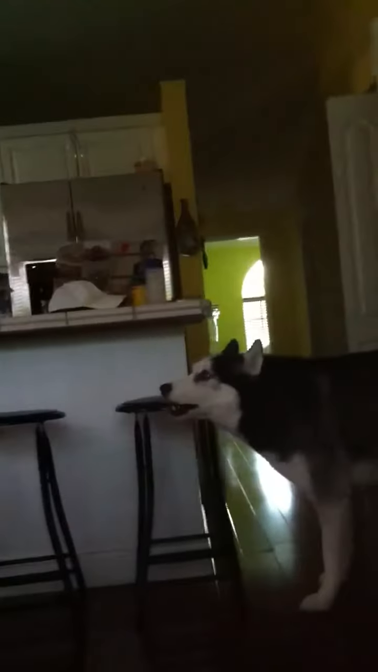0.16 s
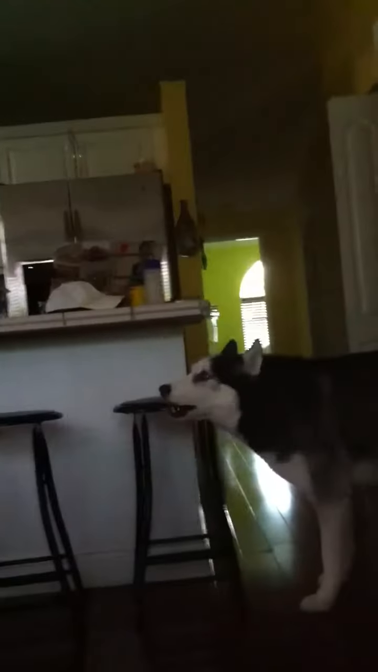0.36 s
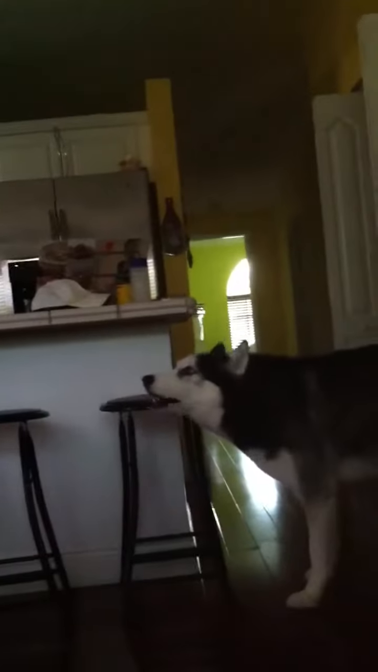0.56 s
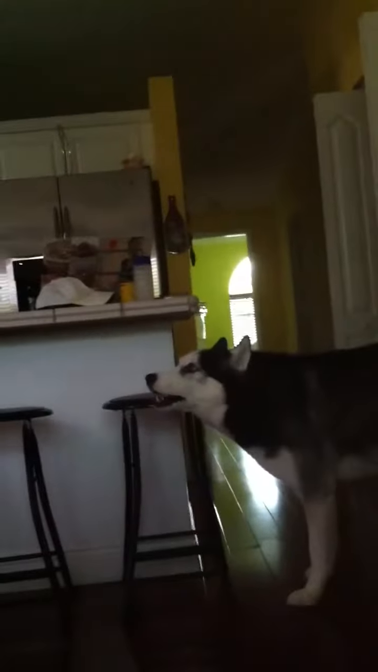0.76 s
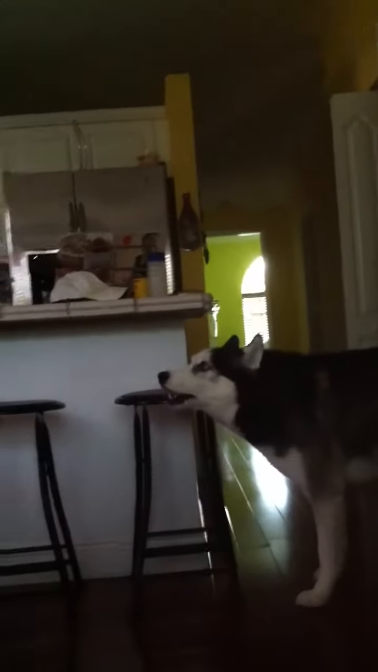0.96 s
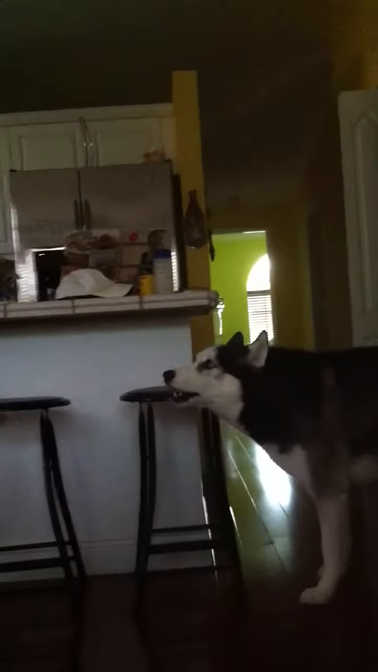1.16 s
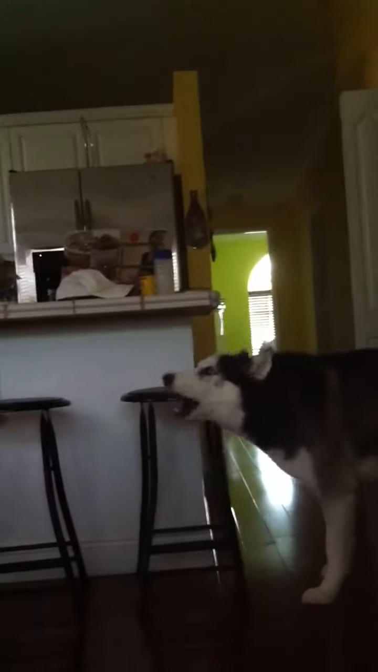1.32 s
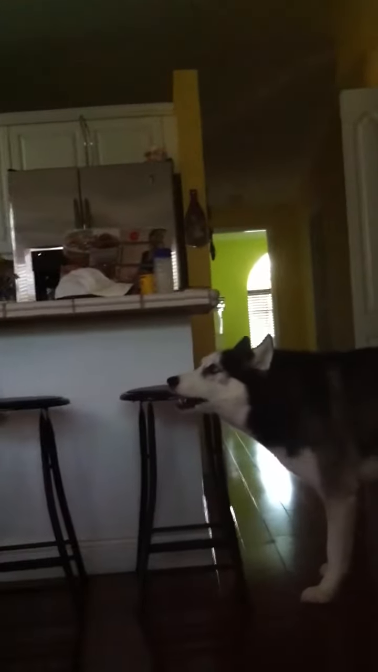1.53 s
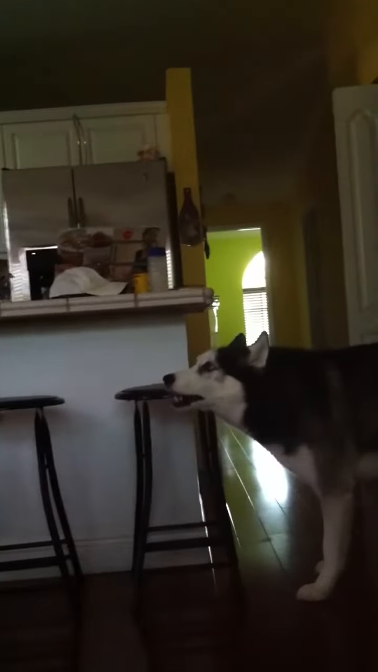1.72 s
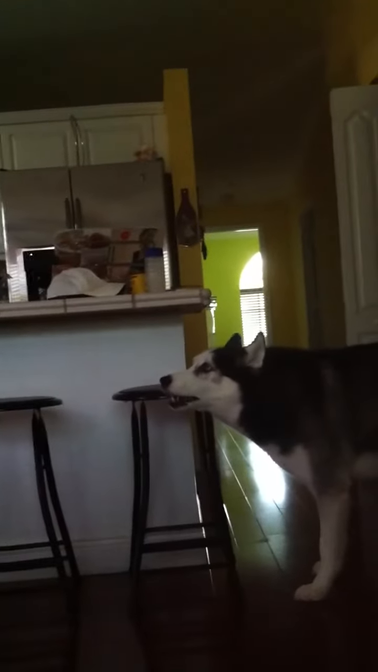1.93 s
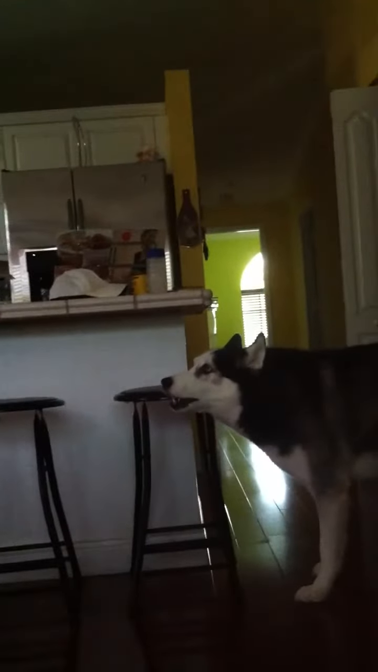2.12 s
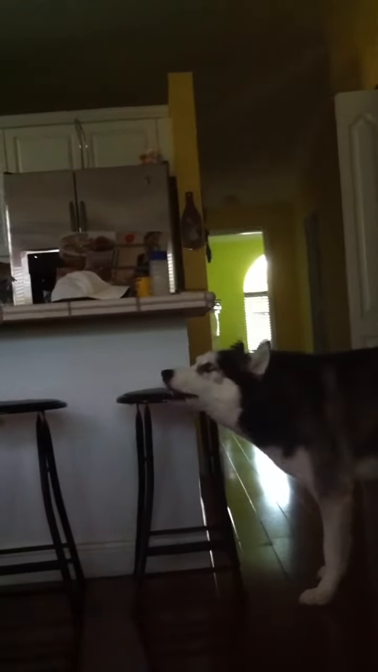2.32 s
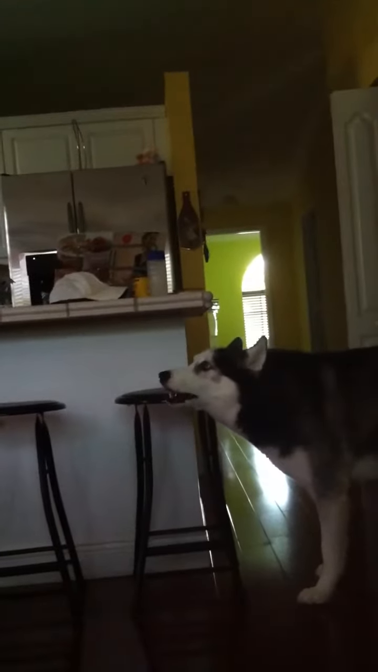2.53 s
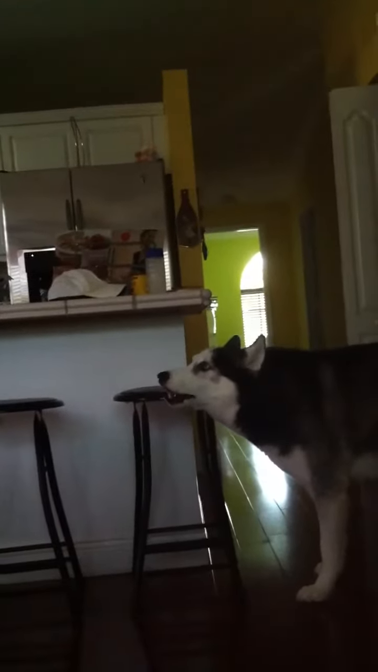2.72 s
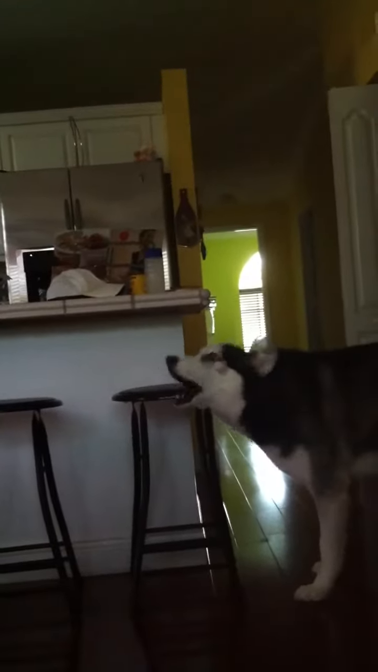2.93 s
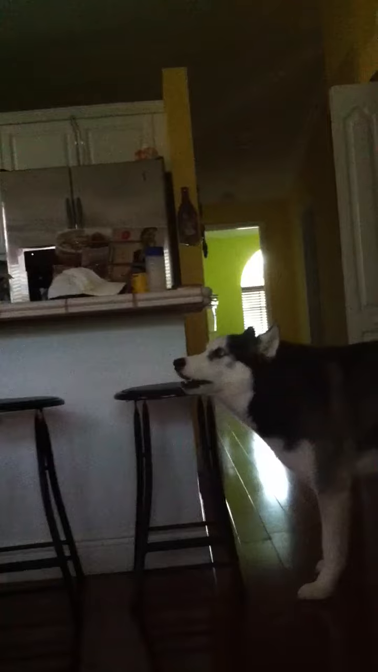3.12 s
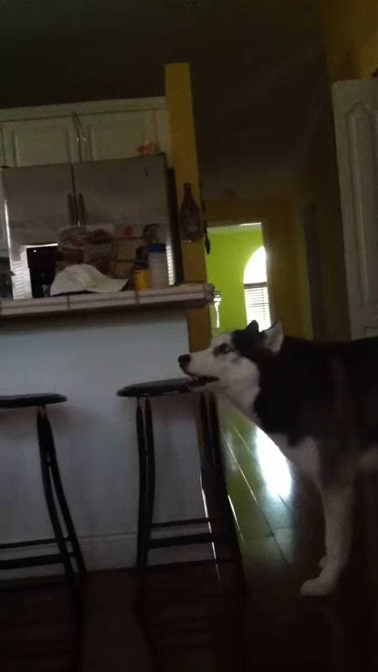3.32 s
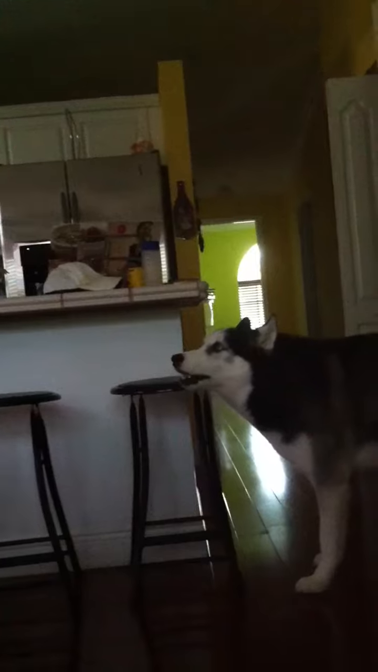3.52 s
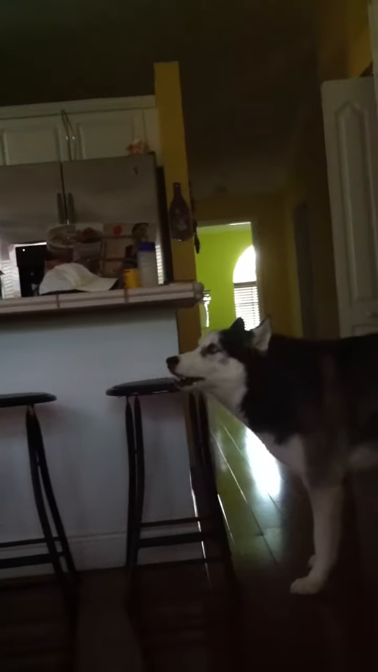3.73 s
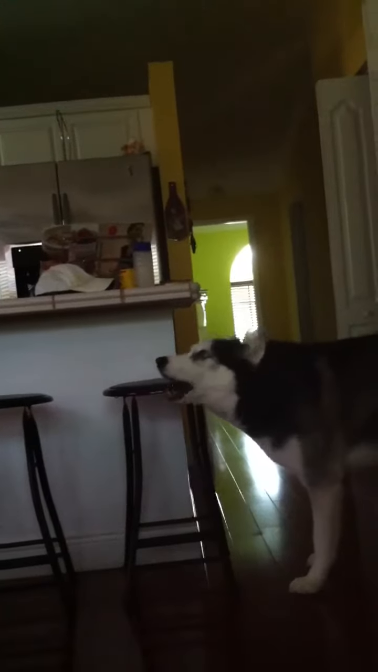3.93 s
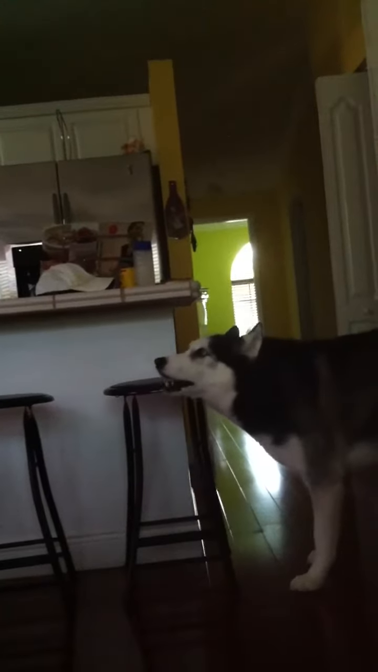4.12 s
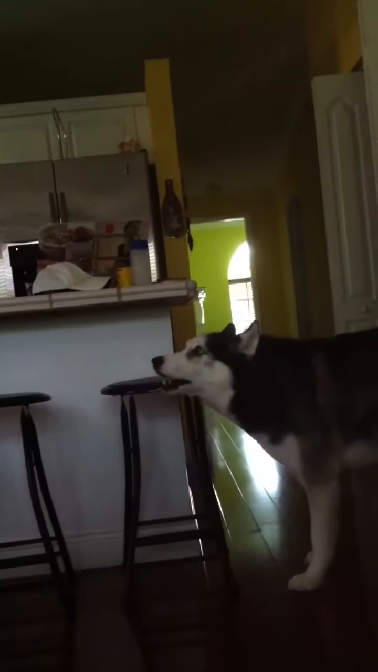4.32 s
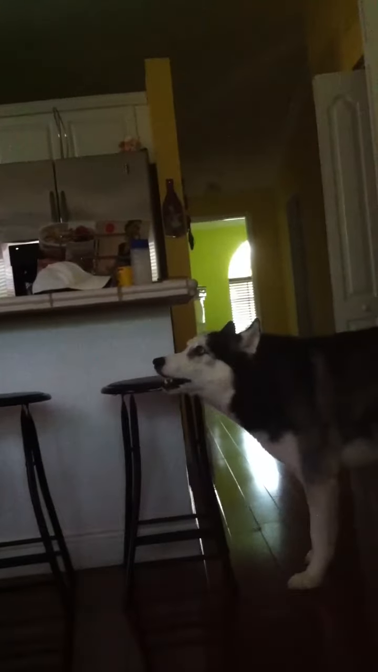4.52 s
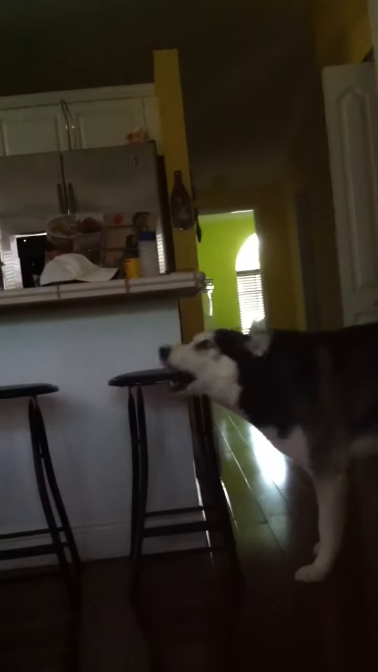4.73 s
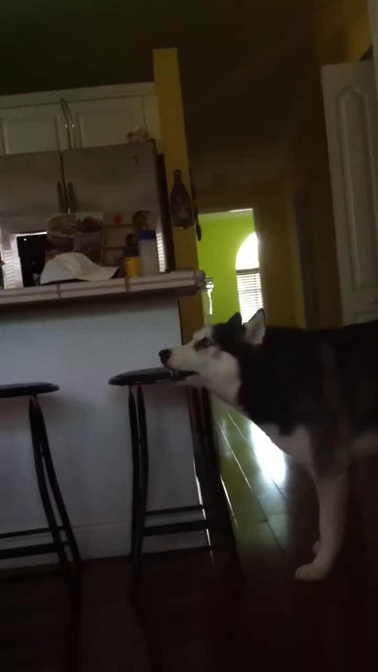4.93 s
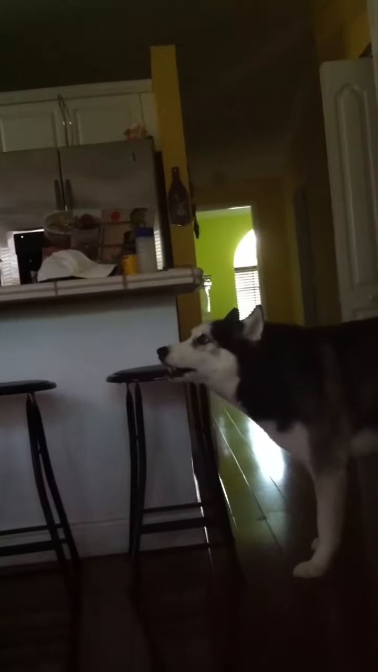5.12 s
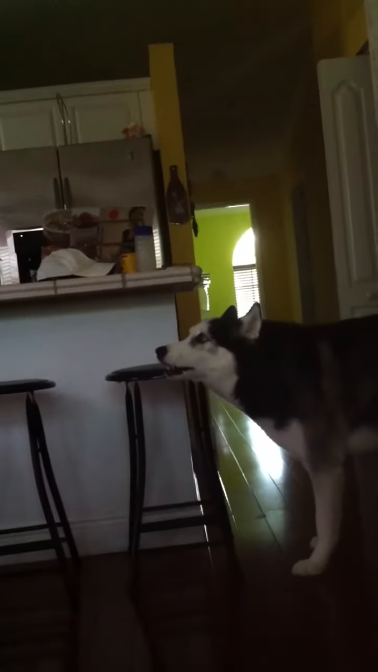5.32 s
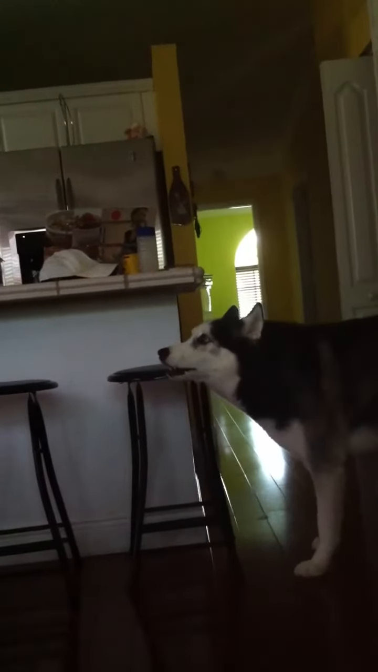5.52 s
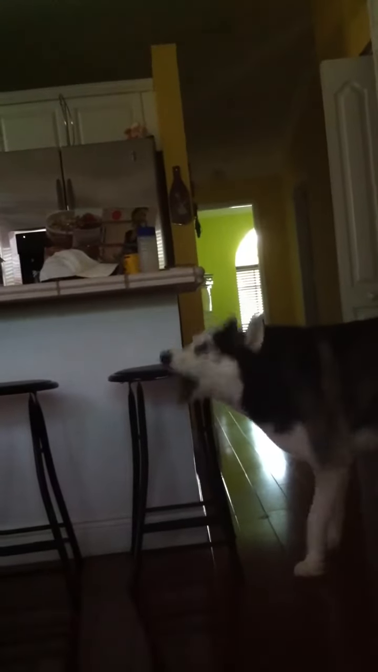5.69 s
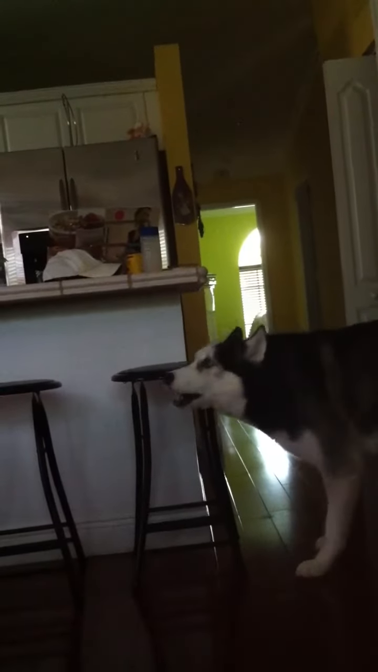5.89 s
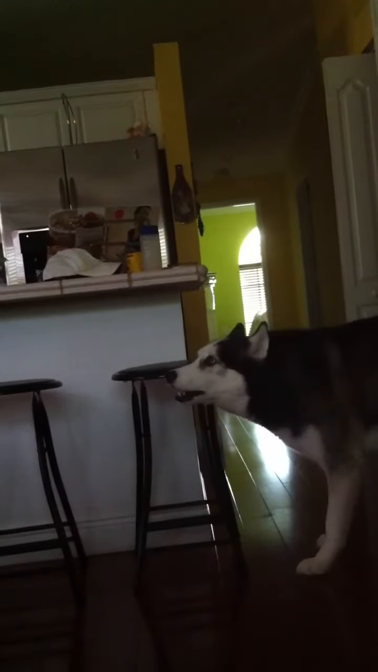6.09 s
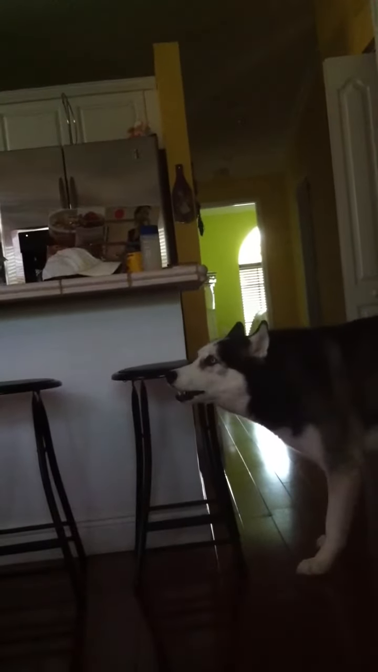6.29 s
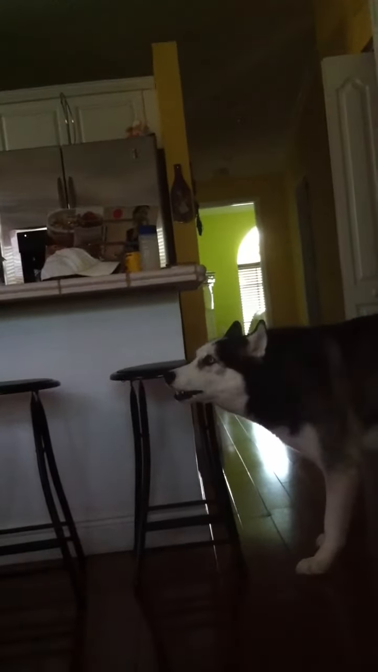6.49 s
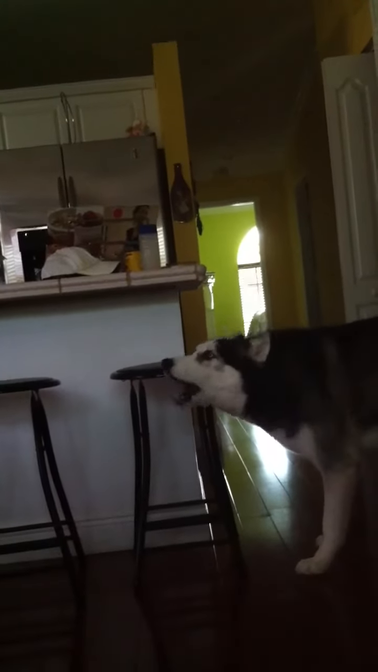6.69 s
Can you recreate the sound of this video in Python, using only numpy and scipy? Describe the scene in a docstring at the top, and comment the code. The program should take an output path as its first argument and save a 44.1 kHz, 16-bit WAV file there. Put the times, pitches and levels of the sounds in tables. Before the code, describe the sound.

The sound opens on the fading echo of an earlier bark over a soft, steady room tone with a little low hum. A husky then barks eight times in a hard-floored kitchen, at about 0.5, 1.3, 2.3, 3.0, 3.9, 4.7, 5.8 and 6.7 seconds, the last right at the end. Each bark is short and loud: a quick huff swells into a hoarse, throaty rush of air with a mid-pitched tone that usually rises slightly, then stops. The barks are similar in strength, the first a little softer, and their peaks sound slightly flattened. At about 2.3 seconds, out of the third bark, something like a glass rings very faintly and dies away over a second or so. The single microphone is well out in the room, so each bark leaves an echo lasting up to a second.

```python
"""A husky in a hard-floored, echoing kitchen, on one microphone well out in the room's reverberation.
We open on the tail of an earlier bark over soft room tone; eight barks follow, about one a second.
Each starts as a huff, swells to a hoarse rush of air with a mostly rising tone near 500 Hz, shaped by
throat and mouth, and stops. The recorder's limiter flattens the peaks; the room rings on in the gaps.
After the third bark something, perhaps a glass, rings faintly."""
import sys
import numpy as np
from scipy import signal
from scipy.fft import rfft, irfft
from scipy.io import wavfile
from scipy.ndimage import uniform_filter1d, minimum_filter1d

SR = 44100
rng = np.random.default_rng(int(sys.argv[2]) if len(sys.argv) > 2 else 0)


def log_audio(samples):
    """Write samples as a 16-bit WAV file to the path given in sys.argv[1]."""
    # one column per channel
    frames = np.atleast_2d(samples).T
    # limit to full scale, then quantise
    limited = np.clip(frames, -1, 1)
    pcm = np.round(limited * 32767).astype(np.int16)
    wavfile.write(sys.argv[1], SR, pcm)


N = 297675

# one row per bark; the other levels are relative to effort, and length and lift count from the peak:
# (peak time [s], attack [s], lead-in huff [dB], length [s], effort [dB], throat [dB], clear tone [dB],
# open mouth [dB], bared teeth [dB], first pitch [Hz], last pitch [Hz], pitch lift [s], vowel centre [Hz])
BARKS = [ (0.505, .038, -14, .100, -16, 3, 1.5, -4.5, -10, 491.8, 562.1, .060, 1407),
         (1.335, 0.034, -31, 0.088, -11.5, 0, -0.5, -5, -11.5, 513.8, 564.1, .048, 1422),
         (2.258, 0.03, -23, 0.091, -13, 1, 0, -5.5, -9, 516.4, 560, 0.027, 1640),
         (2.963, 0.03, -36, .096, -12, 1.5, -4, -4.5, -10.5, 523.4, 568, 0.056, 1440),
         (3.936, .030, -22, .116, -13, 1, -1, -8, -11, 507, 565.6, .022, 1576),
         (4.738, 0.027, -36, .098, -12.5, 1, 0, -4.5, -11.5, 544.7, 529.5, .040, 1462),
         (5.767, .031, -35.5, 0.095, -13.5, 1, 3, -4, -13, 469.7, 529.7, 0.0051, 1397),
         (6.708, 0.035, -16, 0.12, -14, 2.5, 4, -5.5, -11.5, 490.7, 539.6, .024, 1460), ]
# resonances of the throat: (centre [Hz], width [Hz], level [dB])
THROAT_BANDS = [(392.3, 48, -12), (599, 190, -2.5), (668, 166, 2.5), (861, 102.4, 3.5), (981, 45.7, -2.5)]
# resonances of the open mouth: (centre [Hz], width [Hz], level [dB])
MOUTH_BANDS = [(1480, 280, -6.5), (1860, 120, -7.5)]
# resonances at the bared teeth: (centre [Hz], width [Hz], level [dB])
TEETH_BANDS = [(2260, 190, 4.5), (2386, 100, -7.5), (2913, 160, -8.5)]
# the teeth's brief bright bite just before the peak: (centre [Hz], width [Hz], level [dB])
BITE_BANDS = [(2393, 230, -1)]
# the breathy "wuh" before the folds lock into a tone: (centre [Hz], width [Hz], level [dB])
HUFF_BANDS = [(457, 149, -2)]
# the push of the chest: (centre [Hz], width [Hz], level [dB])
CHEST_BANDS = [(127.4, 49, -30.5), (188, 44, -26.5), (306, 45, -28.5)]
# air hissing over the tongue: (centre [Hz], width [Hz], level [dB])
HISS_BANDS = [(5984, 870, -25), (6565, 940, -26)]
# thin spray of turbulence from the throat: (centre [Hz], width [Hz], level [dB])
SPRAY_BANDS = [(4610, 330, -40), (8090, 1800, -34), (10200, 1600, -31.5), (13400, 2600, -36.5)]
# reverberation of the kitchen: (frequency [Hz], t60 [s])
KITCHEN_T60 = [(100, 0.17), (200, 0.59), (350, 0.41), (550, 0.68), (1000, 0.97), (2000, 1), (3000, 0.79),
               (6000, 0.79), (10000, 0.43), (16000, .35)]
# standing waves between floor, counter and walls: (frequency [Hz], t60 [s], level [dB])
KITCHEN_MODES = [(186.8, 0.21, 2), (369.2, 0.16, -2.5), (436, 0.19, 0.5), (477.5, 0.3, -2),
                 (514.2, 0.14, -4), (564, 0.83, -1), (738, 0.11, 4), (805, 0.3, 1.5), (970, 1, 6.5),
                 (959.6, 0.17, 3), (1074, 0.07, -3.5), (1348, 0.026, -8.5), (1400, 0.057, 1),
                 (1490, 0.12, -8), (1580, .14, -1), (1610, 0.99, -11.5), (1756, 0.19, -7.5),
                 (2005, 0.11, -3.5), (2310, 0.18, -6.5), (2423, 0.022, -0.5)]
# the partial of a ringing object, perhaps a glass: (frequency [Hz], t60 [s], level [dB])
RING_PARTIAL = (1667.5, 1.93, -39)
# spectrum of the house's room tone: (frequency [Hz], relative level [dB])
ROOM_TONE = [(30, -31), (80, -24.5), (120, 1), (150, -6.5), (190, 7), (260, -0.5), (500, -5), (1500, 0.5),
             (4000, -9), (7000, -12), (11000, -19), (16000, -23.5)]

PRE_ROLL = SR  # samples ahead of the opening, so that the room is already ringing
LEAD_IN_S = .11  # each bark starts this long before its peak


def dog(earlier_s=0.87):
    """The husky barks in turn, after one earlier bark that ends in the pre-roll."""
    out = np.zeros(PRE_ROLL + N + SR)
    peaks = [row[0] for row in BARKS]
    for peak_s, row in zip([peaks[0] - earlier_s] + peaks, [BARKS[0]] + list(BARKS)):
        sound = bark(row)
        start = PRE_ROLL + round((peak_s - LEAD_IN_S) * SR)
        out[start:start + len(sound)] += sound
    return out[:PRE_ROLL + N]


def bark(row, release_s=.028, glide_s=.016, opening_s=0.034, rattle_db=2.0,
         vowel_hz_per_s=1600, tone_db_per_s=41.5):
    """One bark at the muzzle: the chest pushes, the folds rasp and then sing, the jaws open."""
    (_, attack_s, huff_db, length_s, peak_db, throat_db, tone_db, mouth_db, teeth_db,
     first_hz, last_hz, lift_s, vowel_hz) = row
    t = np.arange(SR // 3) / SR - LEAD_IN_S  # 0 at the peak
    fade_in = np.clip((t - t[0]) / .005, 0, 1)
    release = np.exp(-(np.maximum(t - length_s, 0) * 2 / release_s) ** 2)
    push_db = effort(t, attack_s, huff_db)
    lifted = (1 + np.tanh((t - lift_s) / glide_s)) / 2
    pitch = (first_hz + (last_hz - first_hz) * lifted) * (1 + .012 * wobble(30, len(t)))
    # the bark opens up, from 0 to 1, with the air spent so far
    gape = 1 - np.exp(-np.cumsum(from_db(push_db)) / SR / opening_s)
    rasp = larynx(pitch, jitter=.08, shimmer=0.76, air=0.87)
    rasp *= from_db(rattle_db * wobble(120, len(t)))  # loose throat tissue rattles the airflow
    throat = from_db(throat_db + 0.18 * push_db) * even(resonate(rasp, THROAT_BANDS))
    mouth = from_db(mouth_db) * open_mouth(rasp, t, vowel_hz + vowel_hz_per_s * (t - length_s / 2))
    teeth = from_db(teeth_db) * bared_teeth(rasp, t)
    # the huff gives way to a clear tone, and the voice grows purer as the pressure falls
    sung = clear_tone(pitch, jitter=0.03, flutter_db=2.5, second_db=-13.5, third_db=-17.5)
    huff_to_tone = even(np.sqrt(gape) * sung + (1 - gape) * resonate(rasp, HUFF_BANDS))
    tone = from_db(tone_db + tone_db_per_s * np.maximum(t, 0)) * huff_to_tone
    chest = from_db(3.5 - 0.37 * push_db - 17 * gape) * resonate(rasp, CHEST_BANDS)  # heard early
    voice = throat + mouth + teeth + tone + chest + breath(push_db, gape)
    return fade_in * release * from_db(peak_db + push_db) * voice


def effort(t, attack_s, huff_db, depth_db=11.5, huff_ahead_s=0.03, huff_db_per_s=380.5,
           hold_s=0.029, sag_db_per_s=105):
    """Push of the breath in dB: soft huff, steep swell, short hold, then a sag as the air is spent."""
    before = np.maximum(-t, 0)
    swell = -depth_db * (before / attack_s) ** 1.79
    huff = huff_db - huff_db_per_s * np.maximum(before - huff_ahead_s, 0)
    return np.maximum(swell, huff) - sag_db_per_s * np.maximum(t - hold_s, 0)


def larynx(pitch, jitter, shimmer, air):
    """Vocal folds slap irregularly; every opening lets out a puff of turbulent air."""
    size = len(pitch)
    cycles = np.cumsum(pitch * (1 + jitter * wobble(220, size))) / SR
    slaps = np.diff(np.floor(cycles), prepend=0) * (1 + shimmer * rng.standard_normal(size))
    puffs = rng.standard_normal(size) * (1 + np.cos(2 * np.pi * cycles))
    return rms_one(slaps - slaps.mean()) + air * rms_one(puffs)


def clear_tone(pitch, jitter, flutter_db, second_db, third_db):
    """The regular part of the folds' swing: a strong fundamental with two weak overtones."""
    size = len(pitch)
    phase = 2 * np.pi * np.cumsum(pitch * (1 + jitter * wobble(120, size))) / SR
    wave = np.sin(phase) + from_db(second_db) * np.sin(2 * phase) + from_db(third_db) * np.sin(3 * phase)
    return rms_one(wave * from_db(flutter_db * wobble(62, size)))


def open_mouth(rasp, t, vowel_hz, ahead_s=0.0077, open_s=0.043, shut_db=-10.5):
    """The jaws open around the peak and let the mouth ring; its resonance climbs: "wo-ah"."""
    opened = (1 + np.tanh((t + ahead_s) / open_s)) / 2
    vowel = from_db(-0.5) * moving_resonance(rasp, vowel_hz, width_hz=160)
    return from_db(shut_db * (1 - opened)) * even(vowel + resonate(rasp, MOUTH_BANDS))


def bared_teeth(rasp, t, bite_ahead_s=.022, bite_s=0.019, rise_db_per_s=48):
    """The teeth give a bright bite just before the peak, and ring again as the jaws close."""
    biting = from_db(1.5) * np.exp(-((t + bite_ahead_s) / bite_s) ** 2)
    bared = from_db(-3.5 + rise_db_per_s * np.maximum(t, 0))
    ringing = even(band(resonate(rasp, TEETH_BANDS), 1900, 3150))
    return bared * ringing + biting * even(resonate(rasp, BITE_BANDS))


def breath(push_db, gape, gust_db=2.0):
    """Gusts of air: a hiss over the tongue that swells as the jaws part, and spray from the throat."""
    air = rng.standard_normal(len(gape)) * from_db(gust_db * wobble(50, len(gape)))
    hiss = gape ** .55 * from_db(-1.5 + 0.1 * push_db) * resonate(air, HISS_BANDS)
    spray = from_db(0.18 * push_db) * resonate(air, SPRAY_BANDS)
    return hiss + spray


def kitchen(x, direct_db=-4.0, early_db=-4.0, early_t60=0.063, late_db=-5.5,
            build_s=0.015, diffuse_hz=700):
    """At the microphone: direct sound, echoes off floor and counter, a diffuse tail, standing waves."""
    t = np.arange(3 * SR // 2) / SR
    edges = np.geomspace(60, 20000, 19)
    white = rng.standard_normal((2, len(t))) / np.sqrt(SR)
    response = np.zeros(len(t))
    for k, (low, high) in enumerate(zip(edges, edges[1:])):
        hz = np.sqrt(low * high)
        echoes = band(white[k % 2], low, high)
        scattered = hz / np.hypot(hz, diffuse_hz)  # furniture scatters only the short waves
        early = (scattered * from_db(early_db), early_t60)
        late = (from_db(late_db), at_hz(KITCHEN_T60, hz))
        for gain, t60 in early, late:
            decay = np.log(1000) / t60
            response += gain * np.sqrt(2 * decay) * np.exp(-decay * t) * echoes
    response *= 1 - np.exp(-t / build_s)
    for hz, t60, db in KITCHEN_MODES:
        decay = np.log(1000) / t60
        response += from_db(db) * 2 * decay / SR * np.exp(-decay * t) * np.cos(2 * np.pi * hz * t)
    return from_db(direct_db) * x + signal.fftconvolve(x, response)[:len(x)]


def faint_ring(start_s=2.32, swell_s=.03):
    """Somewhere in the room one soft partial swells out of the third bark and dies away."""
    hz, t60, db = RING_PARTIAL
    t = np.maximum(np.arange(N) / SR - start_s, 0)
    swell = 1 - np.exp(-t / swell_s)
    return from_db(db - 60 * t / t60) * swell * np.sin(2 * np.pi * hz * t)


def room_tone(level_db=-61.5):
    """The house behind it all: a steady soft rush with a little rumble."""
    hz = np.arange(N // 2 + 1) * SR / N
    spectrum = rfft(rng.standard_normal(N)) * from_db(at_hz(ROOM_TONE, hz))
    return from_db(level_db) * rms_one(irfft(spectrum, N))


def resonate(x, bands):
    """Parallel resonances, each at its own rms level."""
    return sum(from_db(db) * rms_one(band(x, hz - width / 2, hz + width / 2)) for hz, width, db in bands)


def moving_resonance(x, hz, width_hz):
    """A band-pass whose centre slides along hz."""
    carrier = np.exp(2j * np.pi * np.cumsum(hz) / SR)
    lowpass = signal.butter(2, width_hz / 2, fs=SR, output="sos")
    return rms_one((signal.sosfilt(lowpass, x / carrier) * carrier).real)


def band(x, low, high):
    """Band-pass between two edges in Hz."""
    edges = np.clip([low, high], 10, SR / 2 - 100)
    return signal.sosfilt(signal.butter(2, edges, "band", fs=SR, output="sos"), x)


def wobble(rate_hz, size):
    """Smooth random drift with an rms of 1."""
    lowpass = signal.butter(2, rate_hz, fs=SR, output="sos")
    return rms_one(signal.sosfilt(lowpass, rng.standard_normal(2 * size))[size:])


def even(x):
    """Hold the rms near 1 over about 14 ms, keeping the faster grain."""
    return x / np.sqrt(uniform_filter1d(x ** 2, size=601) + 1e-3)


def at_hz(points, hz):
    """Read a table on a log-frequency axis."""
    table = np.array(points)
    return np.interp(np.log(np.maximum(hz, 1)), np.log(table[:, 0]), table[:, 1])


def from_db(db):
    return 10 ** (np.asarray(db) / 20)


def rms_one(x):
    return x / np.sqrt(np.mean(x ** 2) + 1e-20)


def scene():
    """What reaches the one microphone: the dog in the kitchen, the faint ring, the room tone."""
    return (kitchen(dog())[PRE_ROLL:] + faint_ring() + room_tone())[None]


def limiter(x, threshold_db, release_db_per_s=40):
    """The recorder's gain ducks just ahead of each peak and creeps back."""
    ramp = release_db_per_s * np.arange(N) / SR
    over_db = np.maximum(20 * np.log10(np.abs(x) + 1e-9) - threshold_db, 0)
    duck_db = np.maximum.accumulate(over_db + ramp, axis=-1) - ramp
    return x * from_db(uniform_filter1d(minimum_filter1d(-duck_db, size=89), size=89))


def record(dry, ceiling=.76, cutoff_hz=15750):
    """The recorder limits, rounds off the remaining peaks and cuts the top treble."""
    held = limiter(dry, threshold_db=-2.0)
    rounded = held / (1 + (held / ceiling) ** 12) ** (1 / 12)
    return signal.sosfilt(signal.ellip(10, .2, 80, cutoff_hz, fs=SR, output="sos"), rounded)


dry = scene()
out = record(dry)
log_audio(out)
```